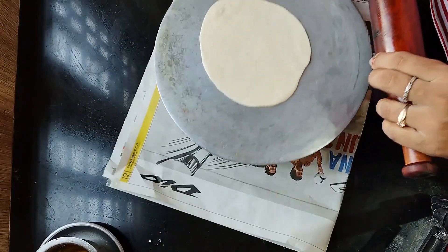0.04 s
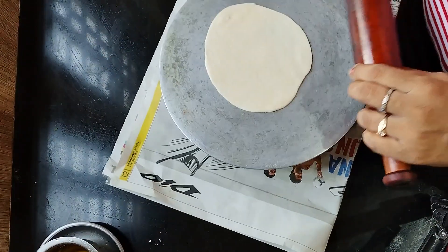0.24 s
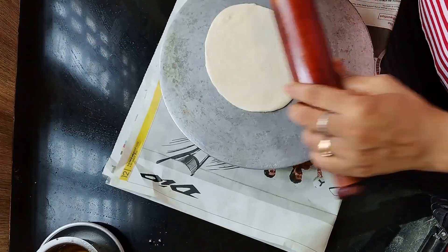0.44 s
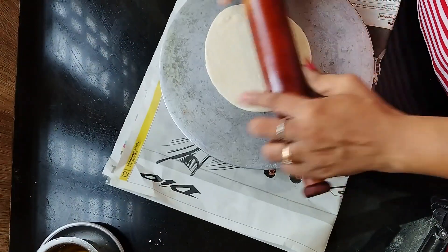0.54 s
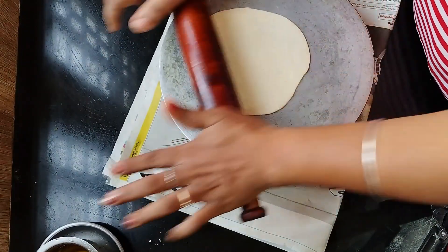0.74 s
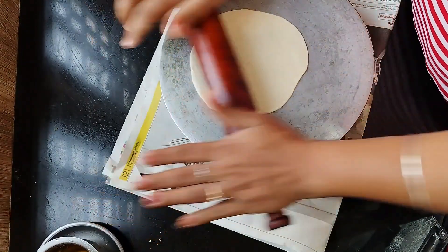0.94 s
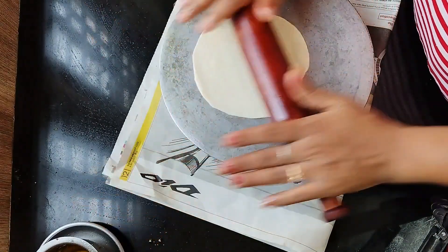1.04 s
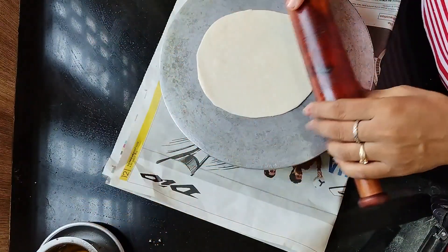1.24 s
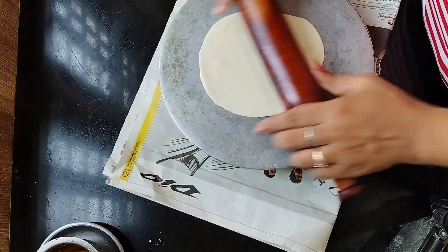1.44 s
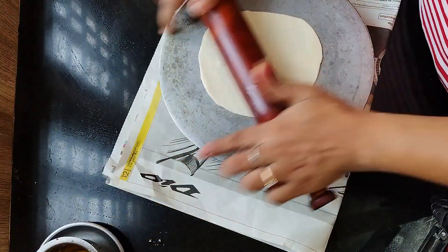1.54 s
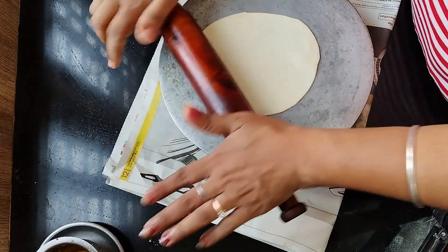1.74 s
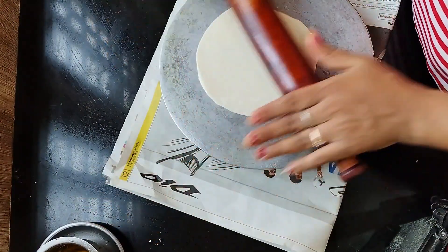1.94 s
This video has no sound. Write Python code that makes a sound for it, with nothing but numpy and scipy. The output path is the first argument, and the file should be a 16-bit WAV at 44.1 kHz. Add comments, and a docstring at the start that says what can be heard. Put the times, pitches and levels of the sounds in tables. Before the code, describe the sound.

Close stereo pickup in a home kitchen: a rolling pin slides and lands on a plate with a bright clatter, then quiet dough rolling, wooden knocks, ring ticks, and distant soft machine thumps underneath.

```python
"""A low room hum near 88 Hz with faint hiss lies under everything; far off a machine thumps softly, five a second.
In a home kitchen an earlier clink still rings and a dull knock comes early. A wooden rolling pin then slides
to a metal plate and is set down: the plate rings as damped modes, each touch damped after a set time.
After the plate the pin rolls over dough, a band-shaped noise rumble, and knocks again;
a finger ring ticks on it and jewellery clinks, both as short, bright metal modes."""
import sys
import numpy as np
from scipy import signal
from scipy.io import wavfile

SR = 44100
rng = np.random.default_rng(int(sys.argv[2]) if len(sys.argv) > 2 else 0)


def inscribe(sig):
    """Save sig as 16-bit PCM at rate SR to the path in sys.argv[1].

    A 1-D sig is mono; a 2-D sig holds one channel per row.
    Samples are clipped to [-1, 1] before scaling.
    """
    pcm = np.round(np.clip(np.atleast_2d(sig).T, -1, 1) * 32767)
    wavfile.write(sys.argv[1], SR, pcm.astype(np.int16))


def boost(x):
    """Linear amplitude factor 10**(x/20) for a level x in decibels (scalar or array-like)."""
    u = np.asarray(x, float) / 20
    return 10 ** u


N = 88200


def at_hz(points, hz):
    """Reads a table's second column on a log frequency axis."""
    table_hz, value = np.array(points).T
    return np.interp(np.log(hz), np.log(table_hz), value)


def rms_one(x):
    """Scales to unit rms."""
    return x / np.sqrt(np.mean(x ** 2) + 1e-20)


def level(curve):
    """Gain along a curve of seconds and dB: silent before its first point, held after its last."""
    s, db = np.transpose(curve)
    return boost(np.interp(np.arange(N) / SR, s, db, left=-200))


def drift(rate_hz):
    """Slow random wander of unit rms: noise through two equal one-pole low-passes."""
    step, run_in = 40, 2000  # samples per slow value, slow values thrown away
    pole = np.exp(-2 * np.pi * rate_hz * step / SR)
    white = rng.standard_normal(N // step + run_in + 2)
    slow = signal.lfilter([1], [1, -2 * pole, pole ** 2], white)[run_in:]
    return np.interp(np.arange(N) / step, np.arange(len(slow)), rms_one(slow))


def bands(white):
    """Yields centre Hz and signal of quarter-octave bands, neighbours on unrelated draws."""
    run_in = 8000  # samples that settle the filters
    edges = 22 * 2 ** np.arange(0, 9.8, 1 / 4)
    for k, (low, high) in enumerate(zip(edges, edges[1:])):
        draw = white[k % 2]
        pair = np.concatenate([draw[:, -run_in:], draw], axis=1)
        band_pass = signal.butter(3, [low, high], "band", fs=SR, output="sos")
        yield np.sqrt(low * high), signal.sosfilt(band_pass, pair)[:, run_in:]


def spread(pair, alike):
    """Left and right from a shared and a differing part."""
    alike = np.clip(alike, 0, 1)
    shared = np.sqrt(1 + alike) * pair[0]
    differing = np.sqrt(1 - alike) * pair[1]
    return shared + differing * [[1], [-1]]


# Stereo width of the noises. Each row: frequency in Hz, left-right likeness (used between 0 and 1).
NOISE_LIKENESS = [(60, 1), (180, 0.82), (550, 0.72), (1650, -1.11), (4970, -0.53), (15000, 0.19)]


def noise(colour, white, patchy_db):
    """Coloured stereo noise of unit rms whose bands flicker independently."""
    total = np.zeros((2, N))
    for hz, pair in bands(white):
        band_db = at_hz(colour, hz) + patchy_db * drift(8.7)
        total = total + boost(band_db) * spread(pair, at_hz(NOISE_LIKENESS, hz))
    return rms_one(total)


def dense(outline, db=0., decay=0.94, count=40):
    """Many small modes at random pitches under the outline of a mode table."""
    rows = np.array(outline)
    hz = np.geomspace(rows[0, 0], rows[-1, 0], count)
    hz = hz * np.exp(.04 * rng.standard_normal(count))
    return list(zip(hz, db + at_hz(rows[:, :2], hz), decay * at_hz(rows[:, ::2], hz)))


def strike(s, db, modes, cut_hz, vary_db, lag_s, rise, low_hz=10., free_s=9., side_db=5.5):
    """One blow: damped sines, damped harder after free_s; soft contacts rise slower and lose the upper modes."""
    damped_t60_s, max_lag_rad = .025, .45
    t = np.arange(N) / SR - s
    live = (t > 0) & (t < .6)
    t = t[live]
    hz, mode_db, t60 = np.transpose(modes)[:, :, None]
    level_chance, side_chance, phase_chance = rng.standard_normal((3, len(modes), 1))
    gain = boost(db + mode_db + vary_db * level_chance)
    gain = gain / (1 + (hz / cut_hz) ** 2) / (1 + (low_hz / hz) ** 2)
    # Past free_s a second, faster decay is added.
    decay = boost(-60 * (t / t60 + np.maximum(t - free_s, 0) / damped_t60_s))
    fade = gain * decay * (1 - np.exp(-(t * cut_hz / rise) ** 2))
    phase = np.minimum(2 * np.pi * hz * lag_s, max_lag_rad) * phase_chance
    out = np.zeros((2, N))
    for side, sign in enumerate((1, -1)):
        ringing = np.sin(2 * np.pi * hz * t + sign * phase)
        out[side, live] = (fade * boost(sign * side_db * side_chance) * ringing).sum(axis=0)
    return out


# Steady room noise: a low hum near 88 Hz under a faint hiss.
# Each row: frequency in Hz, relative density in dB per Hz.
AIR_COLOUR = [(15, -26.5), (25, -7), (53, -14), (68, -13), (88, -1), (150, -22.5), (222, -13.5), (300, -22),
              (420, -15.5), (600, -23.5), (900, -25.5), (2200, -29.5), (4400, -30.5), (7200, -30),
              (8800, -40.5), (10000, -46.5), (11700, -28.5), (13500, -40.5), (15700, -56.5), (19000, -56)]


def air():
    """Steady room noise in a fixed colour, humming near 88 Hz, with a slight flicker in each band."""
    air_db = -48  # rms
    return boost(air_db) * noise(AIR_COLOUR, rng.standard_normal((2, 2, N)), patchy_db=2.04)


# Kitchen reverberation. Each row: frequency in Hz, t60 in seconds, left-right likeness, relative level in dB.
ROOM_BANDS = [(100, 0.507, 0.92, -3), (450, 0.43, 0.74, -4), (784, 0.47, .2, 3.5), (1500, 0.54, 0.043, -6),
              (4150, 0.42, 0.07, 0.5), (8000, 0.43, .1, -0.5), (13680, 0.089, .1, -2)]


def room(x):
    """Diffuse tail: noise that swells in softly and dies band by band."""
    onset_s = 0.011
    t, rows = np.arange(SR) / SR, np.array(ROOM_BANDS)
    tail = np.zeros((2, SR))
    for hz, pair in bands(rng.standard_normal((2, 2, SR))):
        t60, alike, band_db = (at_hz(rows[:, [0, column]], hz) for column in (1, 2, 3))
        tail = tail + spread(pair, alike) * boost(band_db - 60 * t / t60)
    tail = tail * (1 - np.exp(-t / onset_s))
    tail = tail / np.sqrt((tail ** 2).sum() / 2)
    return signal.fftconvolve(x.mean(axis=0)[None], tail, axes=1)[:, :N]


# Far machine thumps, about five a second. Each row: start in seconds, level in dB.
THUMP_TIMES = [(-.14, -44), (.065, -38.5), (0.268, -41.5), (0.464, -41), (0.656, -55), (0.866, -37.5),
               (1.078, -35.5), (1.282, -38.5), (1.486, -36.5), (1.677, -36), (1.903, -34.5)]
# What they set going. Each row: mode frequency in Hz, relative level in dB, t60 in seconds.
LOW_MODES = [(47.7, -19, 0.04), (87, 1, .25), (118, -26.5, 0.041), (171.2, -6.5, 0.21), (228, -8.5, 0.17)]


def thumps():
    """Each thump of the far machine is a low push that sets room-sized modes going."""
    total = np.zeros((2, N))
    for s, db in THUMP_TIMES:
        total += strike(s, db, LOW_MODES, cut_hz=1400.0, vary_db=1.5, side_db=1.2, rise=3.6, lag_s=0.00011)
    return -total  # the modes start downward


# Swell of the rolling. Each row: time in seconds, level in dB.
ROLL_LEVEL = [(0.6, -54.5), (0.914, -53), (1.126, -56.5), (1.398, -75.5), (1.898, -62.5), (2.0, -51)]
# Its colour. Each row: frequency in Hz, relative density in dB per Hz.
RUMBLE_COLOUR = [(120, -5), (250, -2), (430, 8.5), (750, -6.5), (1200, -18), (2500, -48)]


def roll():
    """Rolling over dough: a patchy rumble of noise that swells and sinks."""
    return level(ROLL_LEVEL) * noise(RUMBLE_COLOUR, rng.standard_normal((2, 2, N)), patchy_db=4.5)


# Clinks of jewellery. Each row: start in seconds, level in dB, low cut in Hz.
CLINK_TIMES = [(1.228, -41, 299), (1.2354, -40, 1500), (1.257, -49, 300), (1.295, -54.5, 300),
               (1.831, -46, 6910)]
# Their metal. Each row: mode frequency in Hz, relative level in dB, t60 in seconds.
JEWELLERY_MODES = [(690, -7, .06), (1310, -5, .12), (1405, -4, .13), (2375, -2, .2), (2480, -8, .1),
                   (3000, -13, .03), (3850, -10, .06), (4334, -6, .08), (5000, -13, .04), (5700, -4, .05),
                   (6050, 3, .05), (6535, -5, .05), (7500, -11, .04)]


def clinks():
    """Hard metal contacts ring clear modes over a bed of small ones, a little to the right."""
    metal = JEWELLERY_MODES + dense(JEWELLERY_MODES, db=-8., decay=.45, count=70)
    total = np.zeros((2, N))
    for s, db, low in CLINK_TIMES:
        total += strike(s, db, metal, cut_hz=28000.0, low_hz=low, vary_db=5.8, rise=8.7, lag_s=.00005)
    return boost([[-1.5], [1.5]]) * total


# Finger ring on the pin. Each row: start in seconds, level in dB.
TICK_TIMES = [(0.917, -54), (0.923, -47), (0.931, -50.5), (.946, -55)]
# The ring's voice. Each row: mode frequency in Hz, relative level in dB, t60 in seconds.
FINGER_RING_MODES = [(2325, -6, .09), (2700, -13, .05), (3176, -6, .05), (3800, -7, .05), (4200, -4, .06),
                     (4517, -3, .05), (5150, 0, .03)]


def ticks():
    """A finger ring taps the pin: short, bright modes, to the right."""
    ring = FINGER_RING_MODES + dense(FINGER_RING_MODES, db=-2.5, decay=.9, count=50)
    total = np.zeros((2, N))
    for s, db in TICK_TIMES:
        total += strike(s, db, ring, cut_hz=9700.0, vary_db=np.sqrt(8), rise=8.1, lag_s=.00004)
    return boost([[-2.5], [2.5]]) * total


# Dull knocks, one early and the rest after the plate. Each row: start in seconds, level in dB,
# contact cut-off in Hz, free ring in seconds before damping sets in.
KNOCK_TIMES = [(.075, -45, 400, 0.012), (0.683, -30, 450, 0.0052), (.784, -31.5, 355, 0.013),
               (1.5759, -26, 500, .003), (1.5817, -21.5, 1116, .12)]
# Pin and board. Each row: mode frequency in Hz, relative level in dB, t60 in seconds.
WOOD_MODES = [(296, -17, .1), (420, -5, .08), (501, -6, .08), (700, 0, .08), (970, -14, .05),
              (1200, -7, .16)]


def knocks():
    """Dull knocks of the pin: soft contact leaves mostly the low modes of pin and board."""
    wood = WOOD_MODES + dense(WOOD_MODES, db=-9., decay=.6, count=20)
    total = np.zeros((2, N))
    for s, db, cut, free in KNOCK_TIMES:
        total += strike(s, db, wood, cut_hz=cut, free_s=free, rise=1.1, vary_db=1.4, lag_s=.0001)
    return total


# The pin slides to the plate. Each row: time in seconds, level in dB.
SLIDE_LEVEL = [(.14, -93.5), (.165, -52.5), (.2, -40), (.24, -41), (.26, -93.5)]
# Colour of the scrape. Each row: frequency in Hz, relative density in dB per Hz.
SCRAPE_COLOUR = [(300, -1.5), (1200, -4), (2600, -5), (5000, -15), (8000, -14.5), (10000, -25)]


def slide():
    """The stroke is a dense scatter of random grains, coloured and faded in and out."""
    grains_per_s = 2500  # in each of the four draws
    present = rng.random((2, 2, N)) < grains_per_s / SR
    grains = present * rng.standard_normal((2, 2, N)) + 1e-18
    return level(SLIDE_LEVEL) * noise(SCRAPE_COLOUR, grains, patchy_db=2.0)


# Plate touches; the first is an earlier clink still ringing as the scene begins. Each row: start in seconds,
# level in dB, contact cut-off in Hz, free ring in seconds before damping sets in.
PLATE_TOUCHES = [(-.1, -40, 2500, 0.28), (.2065, -15.5, 700, 0.028), (0.2475, -4, 2124, 0.032),
                 (.284, -2, 400, .015), (.310, -18, 396, .009), (.355, -16, 394, 0.18)]
# The plate's clear modes. Each row: frequency in Hz, relative level in dB, t60 in seconds.
PLATE_MODES = [(450, 0.5, 0.62), (522, -21.5, 0.082), (700, -9.5, 0.093), (790, -9.5, 0.04),
               (903, -25.5, 0.063), (1085.7, -6.5, 0.6), (1237.5, -11, 0.18), (1322.5, 2, 0.056),
               (1562.7, -8.5, 0.9), (1779, -19, 0.065), (2302, -20, 0.38), (2570, -13, 0.11),
               (3490, -19.5, 0.69), (5750, -33.5, 0.051)]
# Outline of its many small modes, heard as clatter. Each row: frequency in Hz, relative level in dB,
# t60 in seconds before the shortening in dense().
CLATTER_OUTLINE = [(378.2, -33.5, 0.049), (700, -18, 0.12), (1310, -18.5, 0.23), (1830, -20.5, 0.21),
                   (3000, -20.5, 0.044), (5250, -19, 0.061), (7900, -20.5, .03), (12260, -34, .02)]


def plate():
    """Each touch rings the plate's clear modes and its clatter; it radiates little bass."""
    modes = PLATE_MODES + dense(CLATTER_OUTLINE, count=120)
    hits = np.zeros((2, N))
    for s, db, cut, free in PLATE_TOUCHES:
        hits += strike(s, db, modes, cut_hz=cut, free_s=free, vary_db=1.5, side_db=2.0, rise=0.86,
                       lag_s=.00005)
    low_cut = signal.butter(4, 356, "high", fs=SR, output="sos")  # Hz
    return signal.sosfilt(low_cut, hits)


def scene():
    """All sources, the room around the near ones and the steady air."""
    room_db, small_send_db = -6, -6  # room return; extra cut on what the small blows send to it
    loud = plate() + slide()
    small = knocks() + ticks() + clinks()
    reverb = boost(room_db) * room(loud + boost(small_send_db) * small)
    return loud + small + reverb + thumps() + roll() + air()


def low_pass(x):
    """Removes everything above the highest recorded frequency."""
    return signal.sosfilt(signal.butter(12, 15820, fs=SR, output="sos"), x)


def record(dry):
    """The loudest peaks are rounded off just under full scale."""
    top = .98
    mix = dry / (1 + np.abs(dry / top) ** 6) ** (1 / 6)
    return low_pass(mix)


dry = scene()
out = record(dry)
inscribe(out)
```